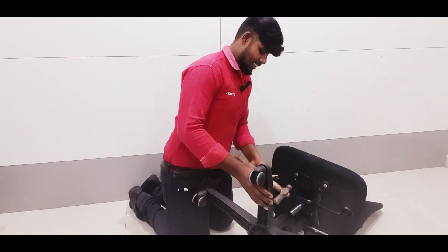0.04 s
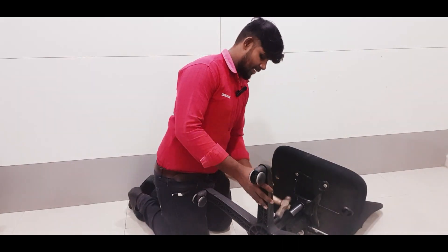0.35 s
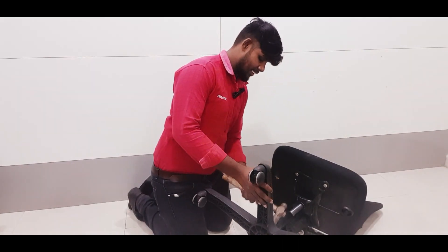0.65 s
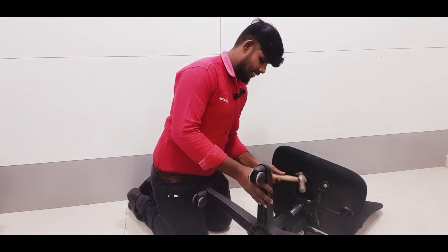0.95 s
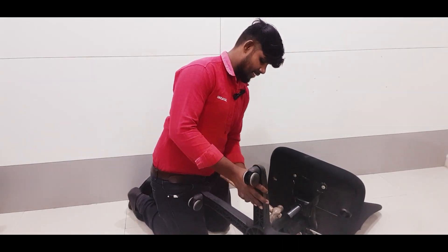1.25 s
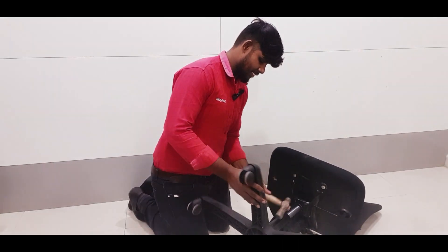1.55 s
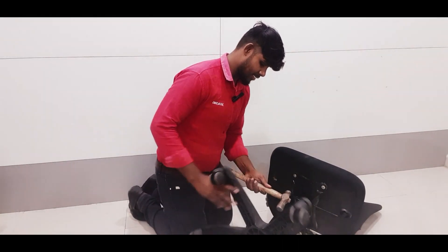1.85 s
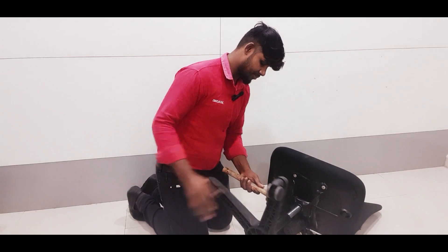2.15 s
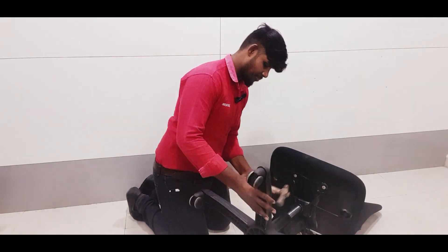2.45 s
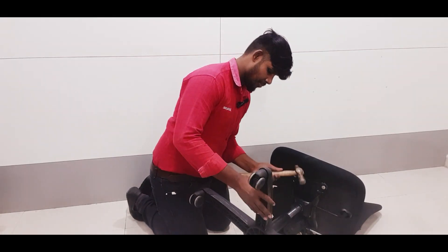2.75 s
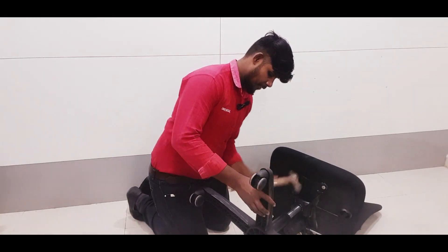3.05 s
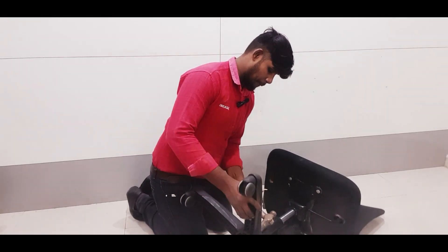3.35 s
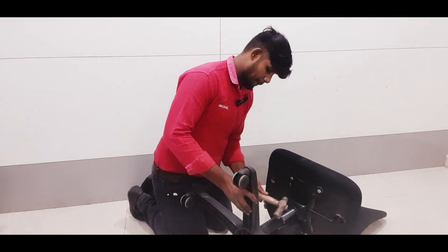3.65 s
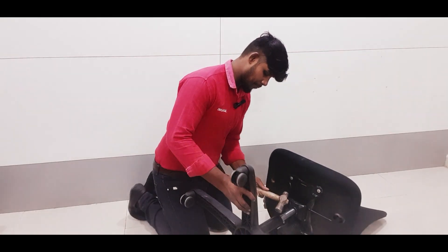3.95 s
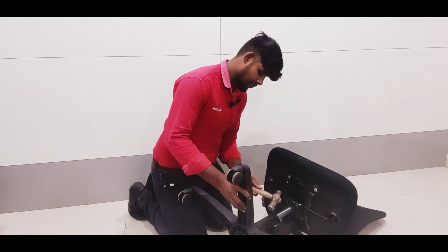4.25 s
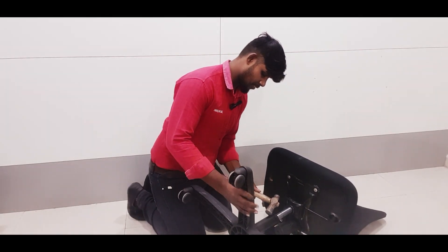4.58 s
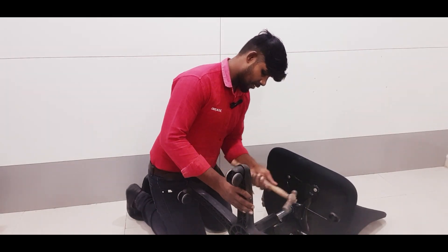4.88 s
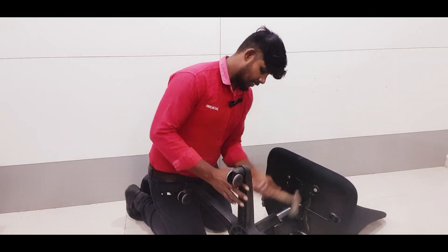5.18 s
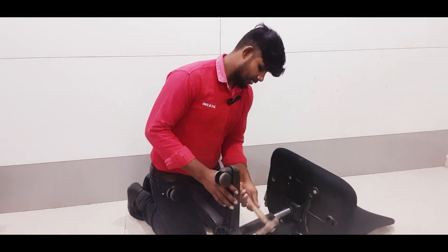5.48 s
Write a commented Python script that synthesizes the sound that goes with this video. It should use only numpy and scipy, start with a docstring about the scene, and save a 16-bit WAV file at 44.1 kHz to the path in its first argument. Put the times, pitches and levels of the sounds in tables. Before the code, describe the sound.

A hammer strikes a metal chair base three times, with a thud and light handling knocks, echoing in a bare room.

```python
"""Hammering an upturned office chair

In a bare, tiled room, a hammer strikes the chair's metal base three times, slightly left of a close pair of
microphones. Before the first blow the chair thuds once, and its castors and fittings knock and tick as it is
handled. Hard walls draw every contact into a long wash. The blows overload the microphones, whose gain control
drops and recovers slowly, so the background sinks after the first."""
import sys
import numpy as np
from scipy import signal
from scipy.fft import rfft, irfft
from scipy.io import wavfile

SR = 44100
rng = np.random.default_rng(int(sys.argv[2]) if len(sys.argv) > 2 else 0)


def log_audio(samples):
    """Write samples as a 16-bit WAV file to the path given in sys.argv[1]."""
    # one column per channel
    frames = np.atleast_2d(samples).T
    # limit to full scale, then quantise
    limited = np.clip(frames, -1, 1)
    pcm = np.round(limited * 32767).astype(np.int16)
    wavfile.write(sys.argv[1], SR, pcm)


N = 243431

# Blows on the upturned base. Each row: start in seconds, level, bass and treble in dB,
# ring of the struck spot in Hz, direct sound at the microphones in dB.
BLOW_HITS = [(1.1408, 5, -1.5, 5.5, 1284, -6.5), (3.138, 4.5, -4, 6, 1266, -21),
             (5.286, 1, -4, 5, 1177, -4)]
# The crack of steel on the base. Each row: frequency in Hz, level in dB.
CRACK_SPECTRUM = [(30, -19), (90, -10), (150, -9), (230, -1.5), (400, -5), (700, -7.5), (1200, -1.5),
                  (2000, -2.5), (3000, -13), (4500, -15.5), (8000, -24), (11000, -23.5), (15500, -31.5)]
# The base ringing. Each row: pitch in Hz, level in dB, seconds to fall 60 dB.
BASE_RING = [(352, -10.5, 0.08), (563, -5, .15), (870, -1.5, 0.018), (915, -2.5, 0.073), (1132, 3, 0.3),
             (1260, 0.5, 0.045), (1450, -5.5, 0.045), (1548, 6, 0.085), (1624, 0.5, 0.084),
             (1826, -1.5, 0.066), (1940, -0.5, 0.073), (2350, -11, 0.042), (4160, -15, 0.034),
             (5060, -16, 0.034)]


def hammer(spot_db=2, spot_t60_s=0.017, lead_s=0.0032, onset_db=-34, onset_hz=1900):
    """Steel lands on the metal base: the struck spot rings briefly, the whole base longer."""
    out = np.zeros(N)
    soften = signal.butter(4, onset_hz, fs=SR, output="sos")
    for s, db, bass_db, treble_db, spot_hz, direct_db in BLOW_HITS:
        modes = list(BASE_RING) + [(spot_hz, spot_db, spot_t60_s)]
        clang = undb(db) * impact(CRACK_SPECTRUM, modes, bass_db, treble_db)
        blow = np.zeros(N)
        # a faint, dull onset comes just before each blow
        add(blow, s - lead_s, undb(onset_db) * signal.sosfilt(soften, clang))
        add(blow, s, clang)
        # the chair is shifted between blows, so each has its own reflections
        out = out + room(blow, direct_db, build_s=0.0038, early_db=-26.5)
    return out


# Soft bumps as the chair tips, down at the floor. Each row: start in seconds, level in dB.
FLOOR_BUMPS = [(0.882, -34), (2.33, -24), (2.826, -16.5), (3.631, -16.5), (4.74, -24.5)]
# The dull thud and the boom of a bump. Each row: frequency in Hz, level in dB.
THUD_SPECTRUM = [(30, -22), (90, -7), (160, -3), (250, -3), (320, -4.5), (420, -3), (520, -8), (700, -11),
                 (1000, -19), (1700, -21.5), (3000, -39), (4800, -42.5), (7000, -51.5), (11000, -52.5),
                 (15000, -62.5)]
BOOM_SPECTRUM = [(30, -11), (75, 0.5), (120, -2.5), (200, -20), (600, -35), (2000, -61.5)]
# The frame ringing after the thud. Each row: pitch in Hz, level in dB, seconds to fall 60 dB.
FRAME_RING = [(384, 0, .05), (1200, -13, 0.04), (1597, -10, 0.051), (1790, -12, 0.13), (2090, -23.5, .04),
              (2550, -26.5, 0.017), (3930, -36.5, 0.0079)]


def chair_on_floor(thud_s=0.5538, thud_db=-5, rock_back_s=0.21, rock_back_db=-1.5):
    """The chair thuds once on the floor, then tips and bumps softly, rocking back after each bump."""
    out = np.zeros(N)
    add(out, thud_s, undb(thud_db) * impact(THUD_SPECTRUM, FRAME_RING, bend_s=0.0014))
    boom = impact(BOOM_SPECTRUM)
    for s, db in FLOOR_BUMPS:
        add(out, s, undb(db) * boom)
        add(out, s + rock_back_s, undb(db + rock_back_db) * boom)
    # contacts on the floor get stronger early reflections than those up on the base
    return room(out, direct_db=-13, build_s=0.0014, early_db=-5.5)


# Castors and fittings, up on the base. Each row: start in seconds, level, bass and treble in dB.
CLACK_HITS = [(0.25, -49, -4, -29), (2.4265, -24, -0.5, 2.5), (2.83, -47.5, 3, -9.5),
              (4.7058, -30, 9, 10.5)]
# Hollow knocks as the hammer is moved against the chair. Each row: start in seconds, level in dB.
HOLLOW_HITS = [(.40, -50.5), (4.5656, -22.5)]
# The contact of a clack, a hollow knock and a tick. Each row: frequency in Hz, level in dB.
CLACK_SPECTRUM = [(60, -9.5), (350, -12), (800, -4.5), (1600, 0), (2500, -2), (3300, -12.5), (4300, -14.5),
                  (6000, -23.5), (11000, -21), (15000, -41)]
HOLLOW_SPECTRUM = [(60, -10), (250, -6), (450, -15), (1400, -6.5), (2200, -21), (4500, -25.5),
                   (5700, -37.5), (7200, -27), (9000, -45.5), (15000, -57)]
TICK_SPECTRUM = [(100, -13), (600, -3.5), (1600, -4), (4000, -8.5), (8000, -14.5), (13600, -9),
                 (15500, -12)]
# The ring of the plastic shells, a hollow knock and the thin tick.
# Each row: pitch in Hz, level in dB, seconds to fall 60 dB.
SHELL_RING = [(616, 0, 0.029), (1065, 1, 0.034), (1210, 5, 0.032), (2270, -7, .01), (4050, -6, 0.0083)]
HOLLOW_RING = [(366, -3.5, 0.12), (726, 2.5, 0.012), (1360, -5.5, 0.025), (3750, -15, .014)]
TICK_RING = [(560, 11, 0.22), (1600, 4, 0.08), (2760, 4, 0.027), (10530, -1, .015), (12920, 15, 0.012)]


def fittings(tick_s=4.290, tick_db=-40.5, bend_s=0.0017, lead_s=0.0074, touch_db=-10, dull_db=-7):
    """Light contacts travel along a leg: a metal-on-metal tick, hollow knocks and plastic clacks."""
    out = np.zeros(N)
    add(out, tick_s, undb(tick_db) * impact(TICK_SPECTRUM, TICK_RING, bend_s=bend_s))
    for s, db in HOLLOW_HITS:
        add(out, s, undb(db) * impact(HOLLOW_SPECTRUM, HOLLOW_RING, bend_s=bend_s))
    for s, db, bass_db, treble_db in CLACK_HITS:
        # a loose fitting touches, softer and duller, just before it seats
        touch = impact(CLACK_SPECTRUM, SHELL_RING, bass_db, treble_db + dull_db, bend_s)
        seat = impact(CLACK_SPECTRUM, SHELL_RING, bass_db, treble_db, bend_s)
        add(out, s - lead_s, undb(db + touch_db) * touch)
        add(out, s, undb(db) * seat)
    return room(out, direct_db=-12.5, build_s=0.00092, early_db=-12.5)


def impact(spectrum, modes=(), bass_db=0, treble_db=0, bend_s=0, size=16384):
    """One contact: a coloured click plus ringing modes, tilted by where and how hard it lands."""
    hz = np.fft.rfftfreq(size, 1 / SR)
    power = undb(on_log(spectrum, hz)) ** 2
    for mode_hz, db, t60 in modes:
        width_hz = np.log(1000) / (np.pi * t60)
        resonance = undb(db) ** 2 / (1 + (2 * (hz - mode_hz) / width_hz) ** 2)
        # a mode only counts near its own pitch
        power = power + resonance / (1 + (2 * (hz - mode_hz) / mode_hz) ** 2)
    tilt = undb(bass_db / (1 + (hz / 600) ** 2) + treble_db / (1 + (3000 / (hz + 1)) ** 2))
    # minimum phase: nothing sounds before the contact
    cepstrum = irfft(np.log(np.sqrt(power) * tilt))
    cepstrum[1:size // 2] *= 2
    cepstrum[size // 2 + 1:] = 0
    # bending waves carry the treble faster than the bass; 1 kHz arrives bend_s late
    lag = 4 * np.pi * bend_s * np.sqrt(1000 * hz)
    fade = np.cos(np.linspace(0, np.pi / 2, size))
    return irfft(np.exp(rfft(cepstrum) - 1j * lag)) * fade


# Reverberation off the tiled walls. Each row: frequency in Hz, seconds to fall 60 dB.
WALL_DECAY = [(60, 1.15), (250, 0.98), (600, 1.058), (1300, 1.032), (2000, 0.96), (3000, 0.87),
              (4500, 1.025)]
# Standing waves between the walls. Each row: pitch in Hz, level in dB.
STANDING_WAVES = [(80, 4.5), (102, 10), (135, -1), (211, 11), (234, 6), (265, 9.5), (410, 6), (542, 8)]


def room(dry, direct_db, build_s, early_db, early_s=0.045, sparse_hz=230, sparse_db=-4):
    """Direct sound, standing waves in the bass, and wall reflections that die soonest in the treble."""
    size, bands = 65536, 18
    air_loss_hz = 13800  # here the air itself takes 60 dB a second
    t = np.arange(size) / SR
    hz, field = diffuse_field(size)
    # in the bass the reflections thin out into single standing waves
    field = field * undb(sparse_db / (1 + (hz / sparse_hz) ** 2))
    centres = np.geomspace(50, 16000, bands)
    tail = 0
    for centre, share in zip(centres, np.eye(bands)):
        band = irfft(field * on_log(np.c_[centres, share], hz), size)
        decay = np.log(1000) * (1 / on_log(WALL_DECAY, centre) + (centre / air_loss_hz) ** 2)
        tail = tail + band * np.exp(-decay * t)
    # the nearest wall and the floor answer first and strongest
    tail = tail * (1 - np.exp(-t / build_s)) * (1 + undb(early_db) * np.exp(-t / early_s))
    response = tail / np.sqrt(.07 * SR)
    for wave_hz, db in STANDING_WAVES:
        decay = np.log(1000) / on_log(WALL_DECAY, wave_hz)
        wave = np.sin(2 * np.pi * (wave_hz * t + rng.random()))
        response += undb(db) * 2 * decay / SR * np.exp(-decay * t) * wave
    response[:, 0] += undb(direct_db)
    return signal.fftconvolve(dry[None], response, axes=1)[:, :N]


# How alike the room sounds at the two microphones. Each row: frequency in Hz, correlation.
PAIR_CORRELATION = [(30, 0.4), (110, 1), (250, .6), (500, 0.79), (1000, -.2), (2500, 0.025)]


def diffuse_field(size):
    """Spectra of white diffuse sound at two close microphones: alike in the bass, unrelated above."""
    hz = np.fft.rfftfreq(size, 1 / SR)
    alike = np.clip(on_log(PAIR_CORRELATION, hz), -.99, .99)
    mid, side = rfft(rng.standard_normal((2, size)))
    mid, side = mid * np.sqrt((1 + alike) / 2), side * np.sqrt((1 - alike) / 2)
    return hz, np.array([mid + side, mid - side])


# Room tone all round the microphones, rumble and hiss. Each row: frequency in Hz, level in dB.
RUMBLE_SPECTRUM = [(25, -22), (50, -5), (75, -0.5), (88, -10.5), (103, 6), (125, -7.5), (160, -12.5),
                   (400, -17), (800, -24), (2000, -33), (5000, -48), (15000, -49.5)]
HISS_SPECTRUM = [(1000, 1), (4000, -3.5), (7850, -3.5), (7970, 5.5), (8100, -4.5), (10000, -5.5),
                 (12500, 1.5), (15500, -0.5)]


def room_tone(rumble_db=-51, hiss_db=-63):
    """Steady low building rumble and a faint hiss with a thin whine in it."""
    out = 0
    for spectrum, db in ((RUMBLE_SPECTRUM, rumble_db), (HISS_SPECTRUM, hiss_db)):
        hz, field = diffuse_field(N)
        noise = irfft(field * undb(on_log(spectrum, hz)), N)
        out = out + noise / noise.std() * undb(db)
    return out


def gain_control(x, threshold_db=0.57, sense_s=0.046, recover_db_per_s=1):
    """The gain drops at once by as much as the level passes the threshold, then creeps back up."""
    keep = np.exp(-1 / (sense_s * SR))
    power = signal.lfilter([1 - keep], [1, -keep], np.mean(x ** 2, axis=0))
    over_db = 10 * np.log10(np.maximum(power / undb(threshold_db) ** 2, 1))
    recovered_db = recover_db_per_s * np.arange(N) / SR
    cut_db = np.maximum.accumulate(over_db + recovered_db) - recovered_db
    return x * undb(-cut_db)


def undb(db):
    """Decibels to gain."""
    return 10 ** (np.asarray(db) / 20)


def on_log(points, hz):
    """Read (Hz, value) points on a log-frequency axis."""
    point_hz, value = np.transpose(points)
    return np.interp(np.log(np.maximum(hz, 1)), np.log(point_hz), value)


def add(track, s, sound):
    """Mix a sound into a track at s seconds."""
    start = int(s * SR)
    track[start:start + len(sound)] += sound[:len(track) - start]


def scene(hammer_db=57.0, handling_db=43, balance_db=0.3):
    """Blows and handling, slightly left of the microphones, over the room tone."""
    contacts = undb(hammer_db) * hammer() + undb(handling_db) * (chair_on_floor() + fittings())
    return contacts * undb([[balance_db], [-balance_db]]) + room_tone()


def record(dry, knee=2.7, headroom_db=0.84, top_hz=15500):
    """Gain control ducks all after a blow; peaks are rounded, the top is cut and full scale clips."""
    held = gain_control(dry)
    rounded = held / (1 + np.abs(held / undb(headroom_db)) ** knee) ** (1 / knee)
    low_pass = signal.ellip(8, .2, 70, top_hz, fs=SR, output="sos")
    return np.clip(signal.sosfilt(low_pass, rounded), -1, 1)


dry = scene()
out = record(dry)
log_audio(out)
```